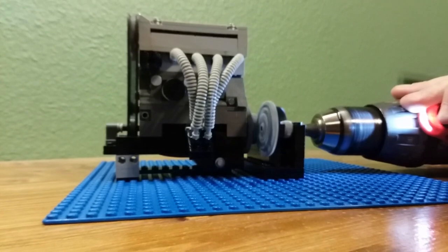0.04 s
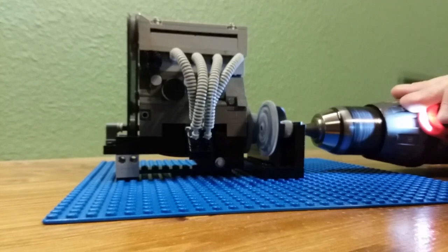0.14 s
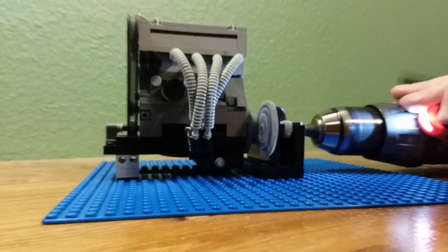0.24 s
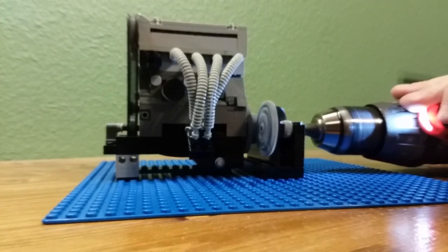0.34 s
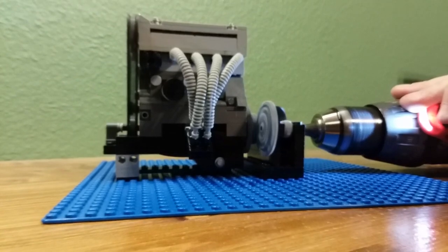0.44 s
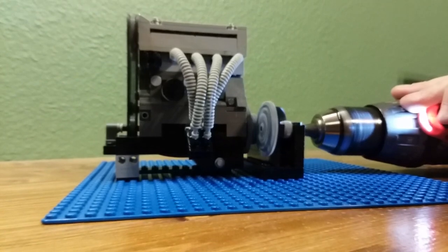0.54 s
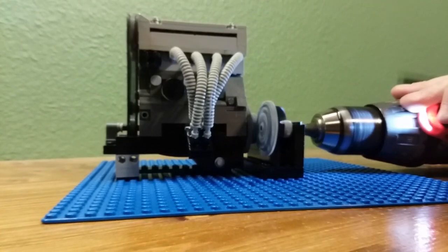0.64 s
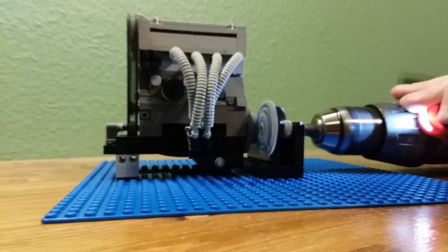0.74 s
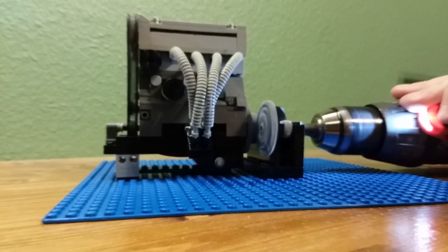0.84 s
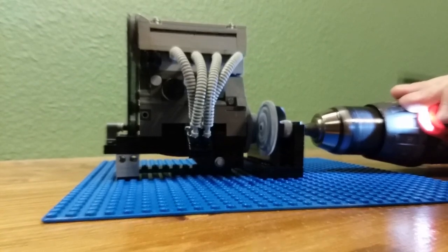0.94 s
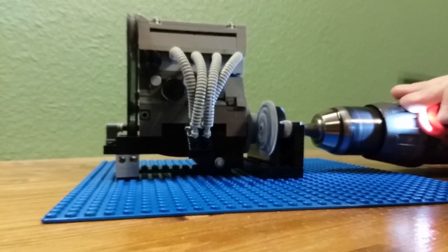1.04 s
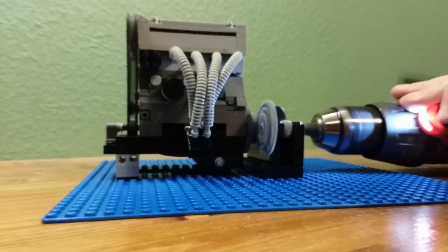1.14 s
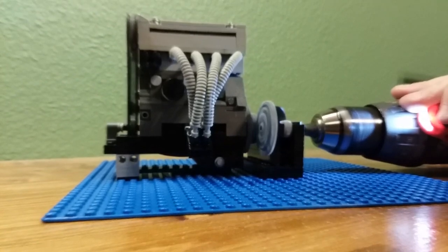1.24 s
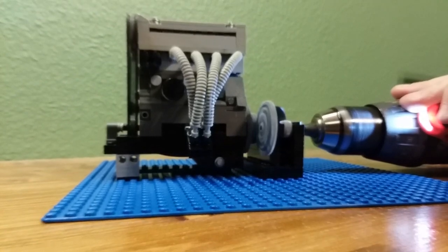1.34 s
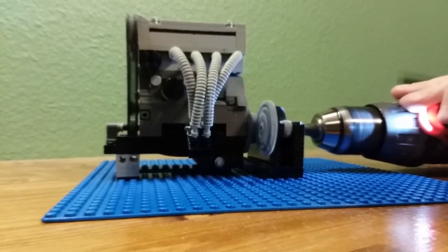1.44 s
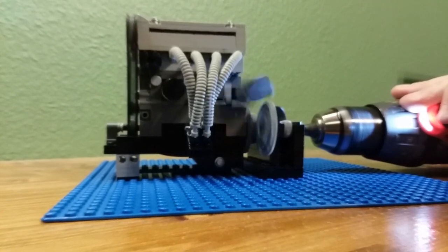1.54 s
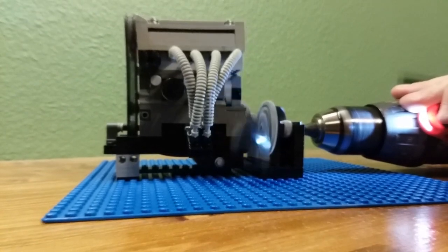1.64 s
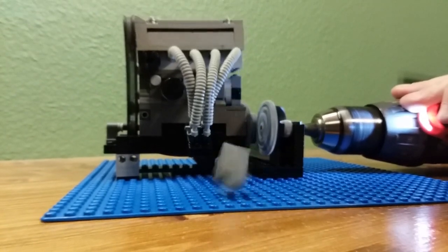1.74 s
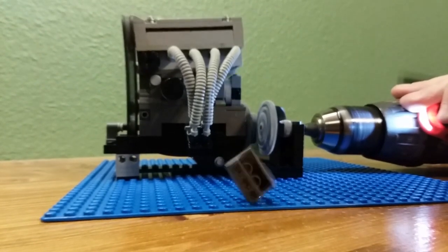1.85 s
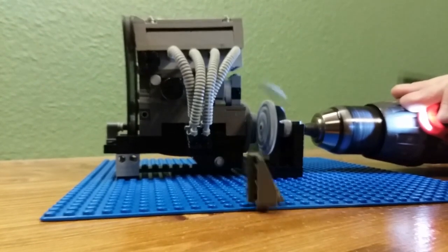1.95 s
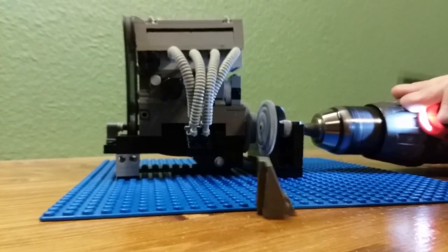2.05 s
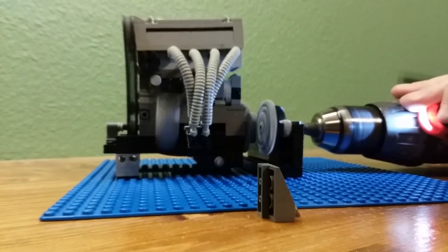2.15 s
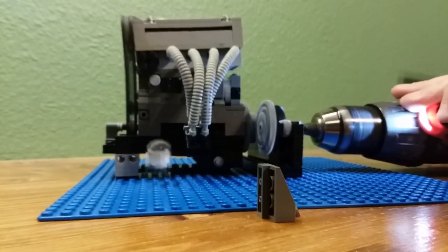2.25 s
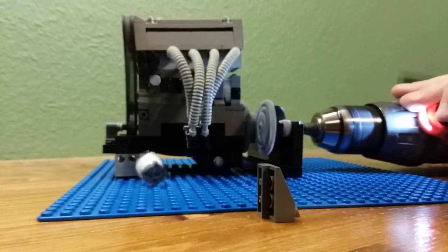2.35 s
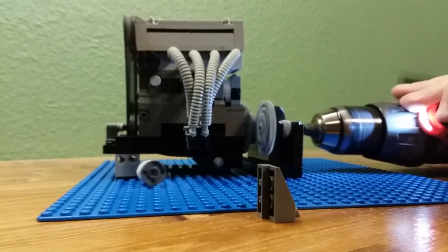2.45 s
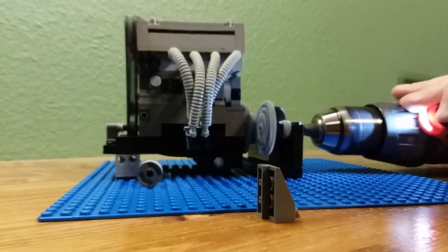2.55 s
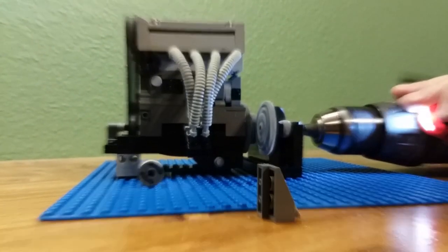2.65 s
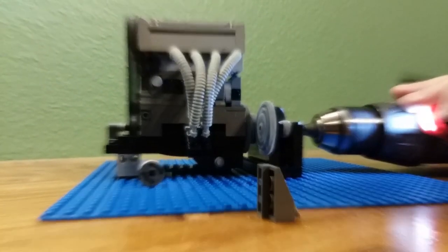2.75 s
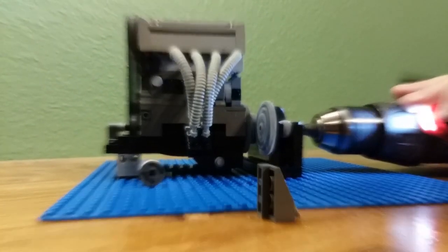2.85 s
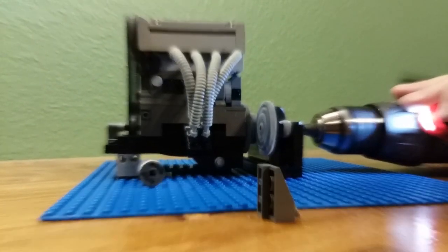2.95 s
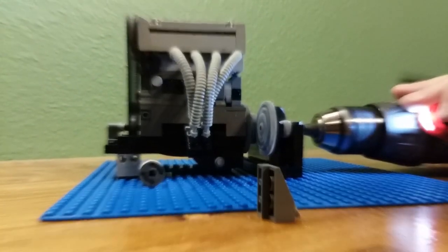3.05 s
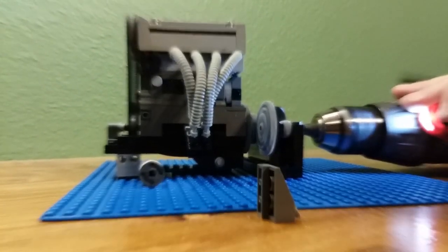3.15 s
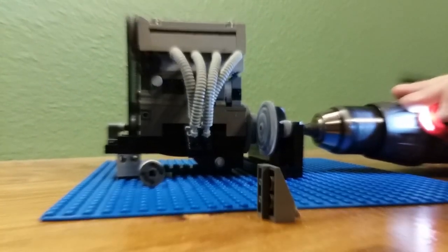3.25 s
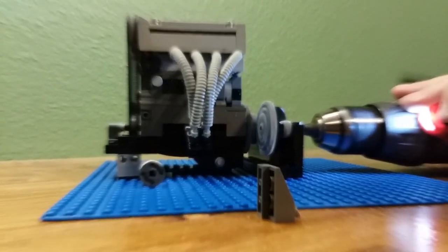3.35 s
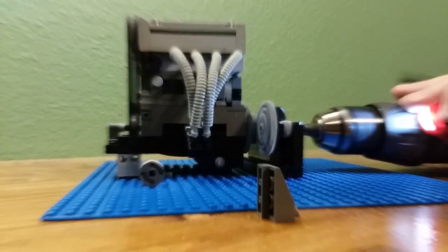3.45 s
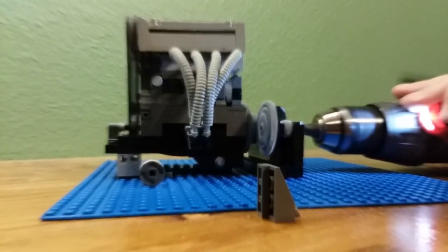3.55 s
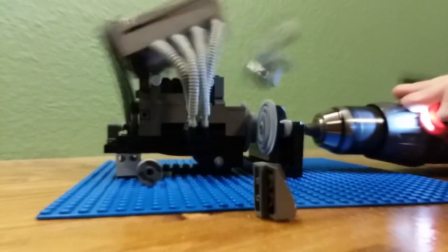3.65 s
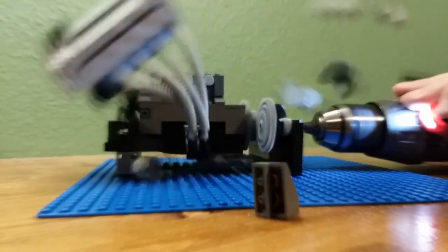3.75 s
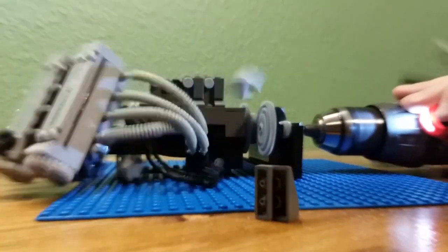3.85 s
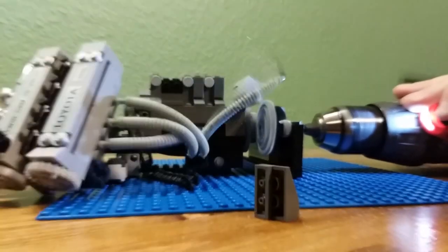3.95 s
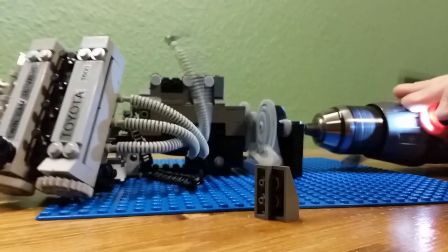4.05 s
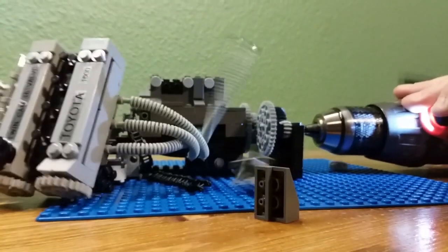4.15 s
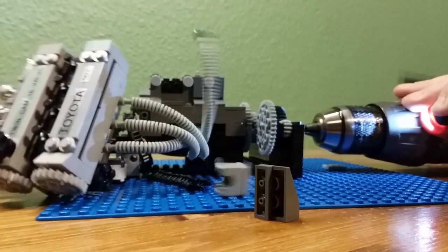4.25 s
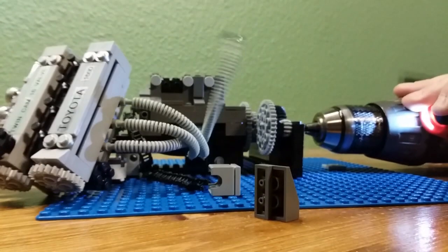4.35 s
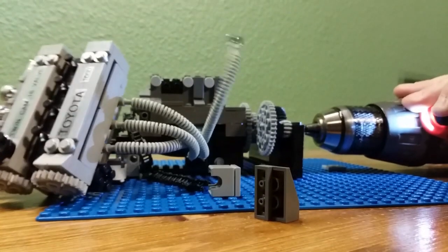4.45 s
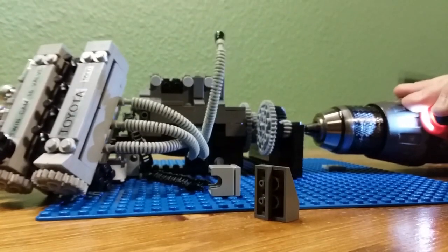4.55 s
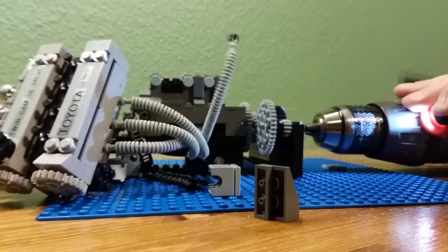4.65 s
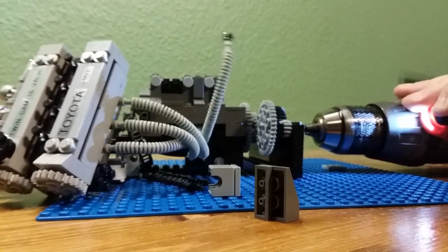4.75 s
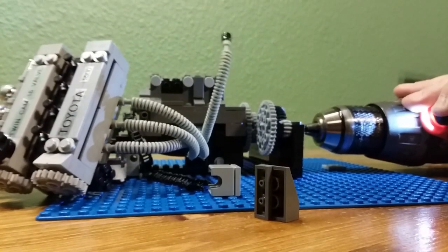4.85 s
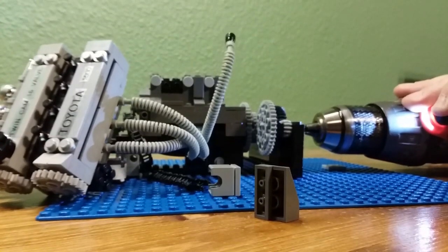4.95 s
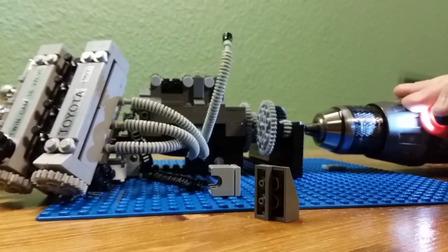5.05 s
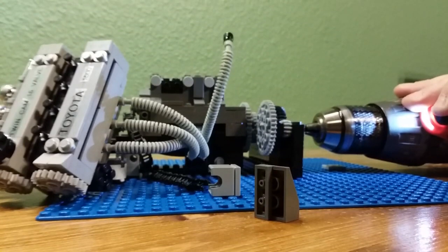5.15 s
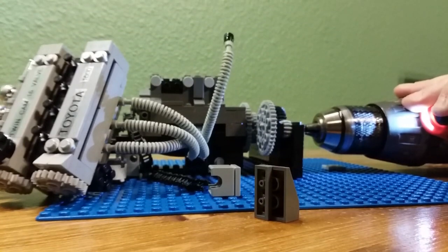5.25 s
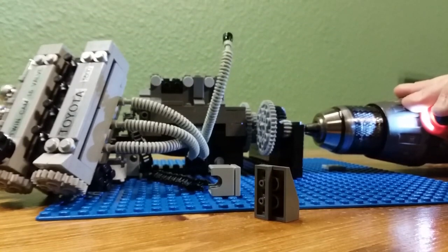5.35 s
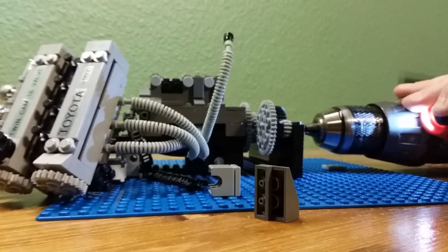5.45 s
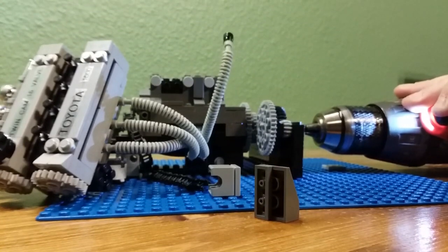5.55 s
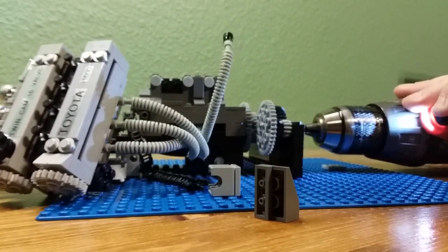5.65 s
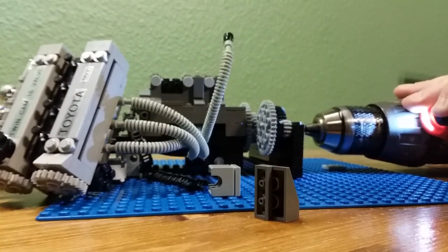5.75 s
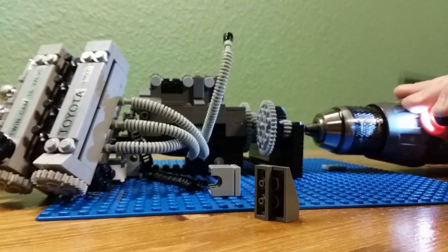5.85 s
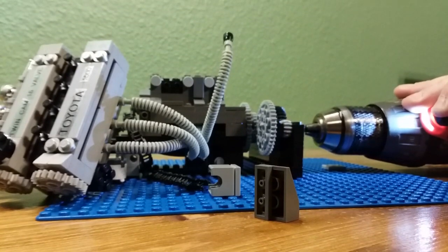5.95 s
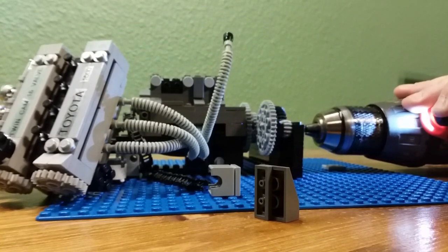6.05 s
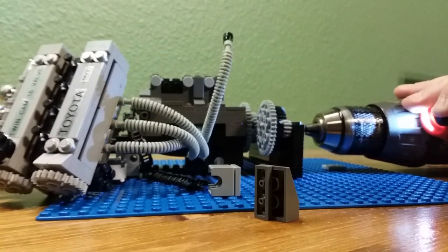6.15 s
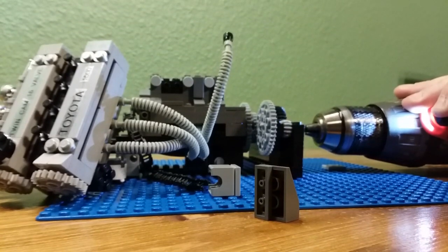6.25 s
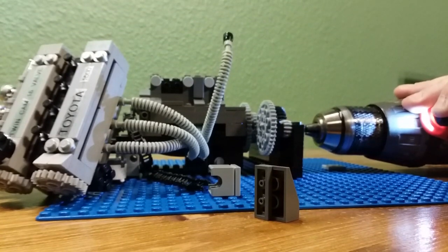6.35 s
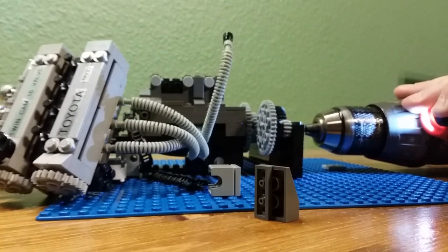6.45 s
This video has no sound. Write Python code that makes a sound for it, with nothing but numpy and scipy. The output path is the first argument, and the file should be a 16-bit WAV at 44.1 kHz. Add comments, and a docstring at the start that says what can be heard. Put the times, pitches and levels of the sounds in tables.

```python
"""A cordless drill spins a plastic brick engine on a wooden table in a small room, close to a two-port phone.
Hum, gear and shaft tones are sines locked to the shaft; the rattling clatter is filtered and ringing knocks.
The motor labours, the engine bursts, and loose bricks tumble to rest 0.1 to 2 m away as clicks, ticks and notes.
Soft blows ring the table modes, noisy tails make the room, and a faint background noise flickers behind it all."""
import sys
import numpy as np
from scipy import signal
from scipy.fft import rfft, irfft, next_fast_len
from scipy.io import wavfile
from scipy.ndimage import uniform_filter1d

SR = 44100
rng = np.random.default_rng(int(sys.argv[2]) if len(sys.argv) > 2 else 0)


def volts_from_db(level):
    """Convert decibel levels to linear amplitude ratios."""
    exponent = np.asarray(level, float) / 20
    return 10 ** exponent


def transcribe(u):
    """Save the signal u as a 16-bit wav file named by the first command-line argument.

    u: samples, shape (n,) or (channels, n), limited to [-1, 1]; the rate is SR.
    q: integer samples, one column per channel.
    """
    v = np.clip(np.atleast_2d(u).T, -1, 1)
    q = np.round(v * 32767).astype(np.int16)
    wavfile.write(sys.argv[1], SR, q)


N = 287091
T = np.arange(N) / SR
PORT_LAG = 20  # samples by which the left port hears late
TOP_HZ = 15900  # highest pitch the phone passes
EVEN_M = 0.5  # distance at which direct sound and room are equally strong


def level(x, db):
    """Scale to an rms level, which may vary in time."""
    return x * volts_from_db(db) / np.sqrt(np.mean(x ** 2))


def over_time(points):
    """Draw a curve through (time [s], value) points."""
    return np.interp(T, *np.transpose(points))


def colour(x, points, share=1):
    """Filter by (frequency [Hz], level [dB]) points, joined on a log frequency axis."""
    hz, db = np.transpose(points)
    n = next_fast_len(N, True)
    log_hz = np.log(np.arange(n // 2 + 1) * SR / n + 1)
    gain = volts_from_db(share * np.interp(log_hz, np.log(hz), db))
    return irfft(rfft(x, n) * gain, n)[:N]


def ring(x, hz, t60):
    """Strike one mode that decays by 60 dB in t60 seconds."""
    pole = np.exp((2j * np.pi * hz - np.log(1000) / t60) / SR)
    return signal.lfilter([1], [1, -pole], x).imag


def walk(rate):
    """Random levels held 1 / rate s and slewed twice; spread near 1."""
    hold = int(SR / rate)
    steps = np.repeat(rng.standard_normal(N // hold + 1), hold)
    return 1.3 * uniform_filter1d(uniform_filter1d(steps, hold), hold)[:N]


def knocks(per_s, spread_db, beat):
    """Random clicks, a few much stronger, bunched where beat is high."""
    hit = rng.random(N) < per_s * beat / SR
    return hit * rng.choice([-1, 1], N) * volts_from_db(spread_db * rng.exponential(size=N))


def high_pass(x, order, hz):
    """Take away the sound below hz."""
    return signal.sosfilt(signal.butter(order, hz, "high", fs=SR, output="sos"), x)


# spectrum of the faint background noise: (frequency [Hz], level [dB])
BACKGROUND_SPECTRUM = [(30, -20), (91, 0), (185, -13), (455, -19.5), (1500, -34), (4000, -41),
                       (10300, -39.5), (16500, -43.5)]
# the background noise is turned down after the crash, then rises again: (time [s], level [dB])
BACKGROUND_LEVEL = [(4.6, -71.5), (5.2, -76.5), (5.3, -66), (5.55, -64), (5.9, -67.5)]


def background():
    """Faint coloured noise, its level flickering; the two ports share its bass."""
    mid, side = (colour(rng.standard_normal(N), BACKGROUND_SPECTRUM) for _ in range(2))
    side = high_pass(side, 1, 400)
    ports = mid + side * np.array([[1], [-1]])
    return level(ports * volts_from_db(1.6 * walk(15)), over_time(BACKGROUND_LEVEL))


def tail():
    """A short decaying noise of unit energy as the room's echoes, alike at both ports only in the bass."""
    t60_s, rise_s = 0.28, 0.0019
    extra_db_per_s = -42.5  # the room swallows the treble sooner
    t = T[:int(.4 * SR)]
    envelope = volts_from_db(-60 * t / t60_s) * np.clip(t / rise_s, 0, 1)
    mid, side = rng.standard_normal((2, len(t))) * envelope
    side = high_pass(side, 1, 350)
    both = mid + side * np.array([[1], [-1]])
    dull = signal.sosfiltfilt(signal.butter(2, 7000, fs=SR, output="sos"), both)
    both = dull + (both - dull) * volts_from_db(extra_db_per_s * t)
    return both / np.sqrt(np.sum(both ** 2) / 2)


def room(x):
    """The room's answer at both ports: the sound convolved with a fresh tail."""
    return signal.fftconvolve(x * np.ones((2, 1)), tail(), axes=1)[:, :np.shape(x)[-1]]


def direct(x):
    """The left port hears late through the air; the bass comes through the table to both at once."""
    bass = signal.sosfiltfilt(signal.butter(2, 800, fs=SR, output="sos"), x[0])
    return np.array([bass + np.roll(x[0] - bass, PORT_LAG), x[1]])


# wooden table top: (frequency [Hz], level [dB], 60 dB decay [s])
TABLE_MODES = [(155, -4, 0.033), (206, -7, 0.018), (308, -5, 0.089), (460, -2, 0.089), (530, -3.5, 0.045)]
# heavier pieces thumping the table: (time [s], strength [dB], modes other than the main one [dB])
THUDS = [(3.84, -11.5, -5), (4.014, -17.5, 8.5), (4.028, -5.5, -18.5), (5.322, -38, 10)]


def thuds():
    """Soft blows ring the table top; light pieces move mostly its main mode."""
    thump_db, lag_s, other_modes_db = -21, 0.005, -15.5  # each loose brick also thumps the table
    main_hz, push_s = 312, .002  # near the table's main mode; length of a soft blow
    light = [(s + lag_s, db + thump_db, other_modes_db) for s, db, *_ in BRICK_LANDINGS]
    s, db, other_db = np.transpose(THUDS + light)
    out = np.zeros(N)
    for hz, mode_db, t60 in TABLE_MODES:
        is_other = abs(hz - main_hz) > 40
        blows = np.zeros(N)
        blows[(s * SR).astype(int)] = volts_from_db(db + mode_db + other_db * is_other)
        out += ring(blows, hz, t60)
    push = np.hanning(int(push_s * SR))
    out = np.convolve(out, push / push.sum())[:N]
    return high_pass(out, 2, 90)


# loose bricks landing around the phone:
# (time [s], strength before distance [dB], note [Hz], distance [m], treble [dB])
BRICK_LANDINGS = [(3.716, -4, 1683, 1.02, -1), (3.739, -15, 2300, .51, 0), (4.021, -13, 1700, .25, -6),
                  (4.082, -15, 2270, .17, 0), (4.106, -14, 2150, .3, -6), (4.117, -13, 2150, .27, -6),
                  (4.187, -17.5, 1660, 0.94, -11), (4.215, -7, 1800, 1, -0.5), (4.235, -17, 1780, .18, -8),
                  (4.269, -15, 1850, .3, -8), (4.305, -10.5, 1085, 0.67, 0), (4.339, -22, 2300, 0.14, 2),
                  (4.369, -36.5, 11200, 0.24, 14), (4.394, -15.5, 2350, 1.3, -11),
                  (4.419, -17, 1144, .4, -3), (4.449, -19, 2560, 0.83, 0), (4.496, -22.5, 1340, 1.1, 2),
                  (4.529, -24.5, 1760, 0.45, 2), (4.577, -20, 1430, 0.43, -1),
                  (4.722, -28.5, 2260, 0.69, 1.5), (4.767, -29.5, 1020, 1.8, -4),
                  (4.855, -26.5, 1030, 1.3, -10), (4.9, -29.5, 2070, 1.1, -8),
                  (4.945, -26.5, 1440, 1.2, -12), (5.013, -30, 1030, 0.68, -11),
                  (5.309, -14.5, 2300, 0.99, 5), (5.318, -26, 3700, 1.1, 9), (5.333, -15, 3050, 0.38, 0.5)]
# click of one plastic brick: (frequency [Hz], level [dB])
BRICK_CLICK = [(180, -30.5), (350, -11.5), (900, -1), (1800, -5.5), (3200, -6), (5300, -19.5), (8700, -37),
               (13000, -23.5), (16500, -35.5)]
# thin walls of a hollow piece: (frequency [Hz], level [dB], 60 dB decay [s])
WALL_MODES = [(5980, -30, .07), (5860, -31, .07), (905, -40, .5)]
# landings of a hollow piece, whose thin walls ring: (time [s])
HOLLOW_LANDINGS = [4.307, 4.34, 4.45, 5.309, 5.332]


def drops():
    """Bricks click, skid in ticks and ring their own notes, near ones crisply; gives direct sound and tails."""
    skid_s, skid_rise_s, ticks_per_s = 0.009, 0.0011, 5000
    note_t60_s, crisp_t60_s = .012, .022
    crisp_db, overtone = -5, 1.88  # a crisp landing rings note and overtone
    fizz_s = .004  # the treble of a landing is spread over many tiny contacts
    left_db, left_db_per_s = 2, -1.5  # left minus right at 5.5 s, and its drift
    near, far = np.zeros(N), np.zeros((2, N))
    lead = 300  # samples kept ahead of the click's peak
    click = colour(1. * (np.arange(N) == lead), BRICK_CLICK)[:2 * lead]
    click /= click.max()
    split = signal.butter(2, 4000, fs=SR, output="sos")
    t = T[:int(.4 * SR)]
    skid = np.exp(-t / skid_s) * (1 - np.exp(-t / skid_rise_s))
    for s, db, hz, metres, treble_db in BRICK_LANDINGS:
        chance = rng.random((2, len(t)))
        tick_hits = (chance[0] < ticks_per_s / SR) * np.sign(chance[1] - .5)
        ticks = 0.51 * min(metres / EVEN_M, 1) * tick_hits * skid
        ticks[0] = 0.78  # the landing itself

        crack = signal.fftconvolve(ticks, click)[lead:lead + len(t)]
        fizz = (chance[1] - .5) * np.exp(-t / fizz_s)
        fizz /= np.sqrt(np.sum(fizz ** 2))
        low = signal.sosfilt(split, crack)
        crack = low + signal.fftconvolve(crack - low, fizz)[:len(t)]

        note = volts_from_db(-23.0) * ring(ticks, hz, note_t60_s)
        hollow = np.min(np.abs(s - np.array(HOLLOW_LANDINGS))) < .005
        if hollow:
            note = note + sum(volts_from_db(g) * ring(ticks, f, t60) for f, g, t60 in WALL_MODES)

        crisp = volts_from_db(crisp_db) * max(1 - metres / EVEN_M, 0) * (t == 0)
        sharp = ring(crisp, hz, crisp_t60_s)
        sharp = sharp + .5 * ring(crisp, min(overtone * hz, TOP_HZ), crisp_t60_s)

        dull = signal.sosfilt(split, crack + note)
        hit = volts_from_db(db) * (dull + volts_from_db(treble_db) * (crack + note - dull))
        i = int(s * SR)
        near[i:i + len(t)] += (hit + volts_from_db(db) * sharp) * EVEN_M / metres
        # every landing place has its own echoes
        far[:, i:i + len(t)] += room(hit)
    side = volts_from_db(np.array([[.5], [-.5]]) * (left_db + left_db_per_s * (T - 5.5)))
    return near * side, far * side


# tones of gears and shaft, each heard for a spell; a few low ones are shaft wobble and hum:
# (start [s], end [s], multiple of shaft rate, level at right port [dB])
SHAFT_TONES = [(-.5, 2.56, 41.8, -28), (2.58, 2.8, 53, -29.5), (3.53, 3.65, 54.5, -26),
               (3.62, 3.76, 45.5, -25), (3.69, 3.77, 23.7, -23), (3.88, 4.01, 37, -26),
               (4.02, 4.1, 45, -31), (2.75, 3.56, 10, -37), (2.7, 3.58, 3.0, -36), (3.699, 3.82, 1.05, -24)]


def whine(shaft_hz):
    """Gears and shaft give slightly wavering tones on multiples of the shaft rate; the low ones wobble and hum."""
    fade_s = .015
    left_db, left_lag = -6.5, 36  # the drill lies to the right: weaker, and samples later, at the left port
    out = 0
    for start, end, multiple, db in SHAFT_TONES:
        fade = np.clip(np.minimum(T - start, end - T) / fade_s, 0, 1)
        hz = multiple * shaft_hz * (1 + .001 * walk(22))
        out = out + volts_from_db(db + 2.2 * walk(40)) * fade * np.sin(np.cumsum(hz) * 2 * np.pi / SR)
    return np.sqrt(2) * np.array([volts_from_db(left_db) * np.roll(out, left_lag), out])


# spectrum of the table shaking: (frequency [Hz], level [dB])
SHAKE_SPECTRUM = [(30, -24.5), (135, 3), (246, -8.5), (312, -5.5), (420, -10.5), (600, -18.5), (1760, -120)]
# spectrum of the engine's rattle: (frequency [Hz], level [dB])
RATTLE_SPECTRUM = [(290, -37.5), (560, -31), (760, -6.5), (860, -1), (1210, 2.5), (1680, 2), (1820, -2),
                   (2270, -3.5), (3000, -12), (3900, -41.5), (6600, -120)]
# spectrum of the ticks of engine and motor: (frequency [Hz], level [dB])
TICK_SPECTRUM = [(1180, -31), (2000, -3), (2730, -9), (3390, -8), (4920, -11.5), (5710, -14.5), (6720, -11),
                 (9500, -30), (12400, -48.5), (20900, -120)]
# spectrum of the motor brushes' hiss: (frequency [Hz], level [dB])
BRUSH_SPECTRUM = [(4710, -29.5), (8000, -3.5), (9090, -5), (12100, 5), (15200, 4), (16300, -25.5)]
# resonances of the brick frame: (frequency [Hz], width [Hz], relative level [dB])
FRAME_MODES = [(1095, 50, -6), (1205, 60, 4), (1310, 120, -4), (1670, 130, -4), (1930, 60, 2)]
# the frame's ringing beside the rest of the rattle; half of it in dB also moves the mesh: (time [s], level [dB])
RINGING_LEVEL = [(0, -4), (1.8, -4), (2.4, -14), (2.7, -3), (3.6, -9)]


def clatter(turn, shake_db, rattle_db, tick_db, hiss_db):
    """Pistons, gears and brushes knock in bunches twice in each turn of the shaft."""
    beat = 1 + .4 * np.cos(2 * turn) + .25 * np.cos(turn)
    shake = colour(knocks(500, 2.6, beat), SHAKE_SPECTRUM)
    blows = knocks(4000, 1.92, beat)
    frame = 0
    for hz, width, db in FRAME_MODES:
        mode = np.sqrt(width) * ring(blows, hz, 2.2 / width)
        frame = frame + volts_from_db(db + 0.39 * walk(22)) * mode
    rattle = level(colour(blows, RATTLE_SPECTRUM), 0) + level(frame, over_time(RINGING_LEVEL))
    tick = colour(knocks(7000, 2.0, beat), TICK_SPECTRUM)
    hiss = colour(knocks(11000, 2.2, beat), BRUSH_SPECTRUM)
    return level(shake, shake_db) + level(rattle, rattle_db) + level(tick, tick_db) + level(hiss, hiss_db)


# buzz of the base plate: (frequency [Hz], level [dB])
PLATE_SPECTRUM = [(250, -40), (400, -3.5), (575, -1.5), (830, -3.5), (1000, -20.5), (1800, -88)]
# the plate buzzes less while the motor labours: (time [s], level [dB])
PLATE_LEVEL = [(0, -30.5), (2.6, -27), (2.68, -39), (3.57, -39), (3.66, -26.5), (3.9, -28), (4.2, -35.5)]


def plate(turn):
    """The base plate buzzes under random knocks bunched twice in each turn."""
    blows = knocks(1500, 2.3, 1 + 0.34 * np.cos(2 * turn))
    return level(colour(blows, PLATE_SPECTRUM), over_time(PLATE_LEVEL))


# motor and engine by the clock, levels relative:
# (time [s], motor shaft rate [Hz], engine rattle [dB], motor brush hiss [dB])
DRILL_RUN = [(0.0, 78.84, -16, -27), (0.18, 80.4, -15.5, -26.5), (1.67, 79.37, -16, -26),
             (2.4, 81.37, -19, -27), (2.49, 70.2, -19.5, -25), (2.619, 54.56, -21.5, -28.5),
             (2.79, 49.5, -21, -29), (2.9, 47.8, -20.5, -27.5), (3.501, 47.45, -20, -28),
             (3.62, 58.5, -18.5, -25), (3.69, 62, -16.5, -24.5), (3.743, 97, -16.5, -24.5),
             (3.885, 98, -18, -25), (3.98, 72, -20, -30), (4.05, 62, -23, -33), (4.129, 50.5, -24.5, -32.5),
             (4.201, 43.7, -27, -36.5)]
# hum of the motor: (multiple of shaft rate, relative level [dB])
HUM_TONES = [(2, 2.5), (3, -5), (4, -7), (7, -9.5)]
# gear mesh tones: (multiple of shaft rate, relative level [dB])
MESH_TONES = [(15.05, 5.5), (24.1, 1.5)]


def drill():
    """Motor hum and whine follow the shaft; clatter comes from many parts, so each port also hears its own."""
    full_hz = 80  # shaft rate at full speed under load
    hum_db, hum_db_per_oct = -27.5, 11  # at full speed; rise with speed
    mesh_db_per_oct = 30  # the mesh tones die away as the motor slows
    shake_over_hiss_db, shake_db_per_oct = 2, 3
    tick_offset_db, engine_share = 1.5, 0.41  # ticks come from engine and motor alike
    release_s, coast_db, coast_fade_s = 3.8, -9, 0.043  # trigger let go: the hum weakens
    stop_s, stop_fade_s = 4.396, 0.36  # silent from stop_s on
    shared_db, own_db = -6, -0.5  # clatter common to both ports; clatter of each port alone

    s, *columns = np.transpose(DRILL_RUN)
    hz, rattle_db, hiss_db = (np.interp(T, s, column) for column in columns)
    octaves = np.log2(hz / full_hz)
    shake_db = hiss_db + shake_over_hiss_db + shake_db_per_oct * octaves
    tick_db = tick_offset_db + engine_share * rattle_db + (1 - engine_share) * hiss_db
    turn = np.cumsum(hz * (1 + .006 * walk(25))) * 2 * np.pi / SR

    hum = sum(volts_from_db(db + 2.2 * walk(14)) * np.sin(k * turn + k ** 2) for k, db in HUM_TONES)
    mesh_db = .5 * over_time(RINGING_LEVEL) + mesh_db_per_oct * np.minimum(octaves, 0)
    for k, db in MESH_TONES:
        hum = hum + volts_from_db(db + mesh_db + 1.1 * walk(30)) * np.sin(k * turn + .5 * walk(40))
    coast = coast_db * np.clip((T - release_s) / coast_fade_s, 0, 1)
    hum = np.sqrt(2) * volts_from_db(hum_db + hum_db_per_oct * octaves + coast) * hum
    tones = np.array([np.roll(hum, PORT_LAG), hum]) + whine(hz)

    shared, *own = (clatter(turn, shake_db, rattle_db, tick_db, hiss_db) for _ in range(3))
    shared = volts_from_db(shared_db) * shared + plate(turn)
    stop = np.clip((stop_s - T) / stop_fade_s, 0, 1)
    return stop * tones, stop * shared, stop * volts_from_db(own_db) * np.array(own)


# how the phone's two ports differ: (frequency [Hz], left minus right [dB])
PORT_BALANCE = [(60, -16), (110, 3), (200, 3), (380, -0.5), (700, 2.5), (1290, 9), (2380, -3), (4400, 1),
                (8120, 0), (15000, 3)]


def scene():
    """Everything on the table, heard directly and through the room at the two ports."""
    clatter_room_db, table_room_db = -7, 2.5
    tones, shared, own = drill()
    near, far = drops()
    table = thuds()
    wet = room(volts_from_db(clatter_room_db) * (shared + own) + volts_from_db(table_room_db) * table) + far
    left, right = tones + table + direct(shared + own + near) + wet
    return np.array([colour(left, PORT_BALANCE, .5), colour(right, PORT_BALANCE, -.5)]) + background()


def top_cut(x):
    """Nothing passes above the cut-off."""
    return signal.sosfilt(signal.butter(12, 16970, fs=SR, output="sos"), x)


def record(dry):
    """The phone cuts the deep bass and the top and clips the highest peaks."""
    x = high_pass(dry, 3, 45)
    x = signal.sosfilt(signal.ellip(8, .2, 70, TOP_HZ, fs=SR, output="sos"), x)
    return top_cut(np.clip(x, -1, 1))


dry = scene()
out = record(dry)
transcribe(out)
```